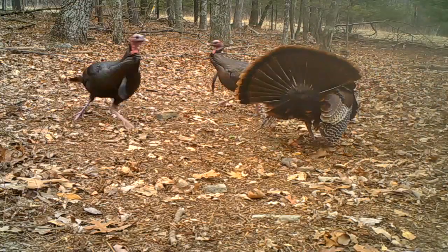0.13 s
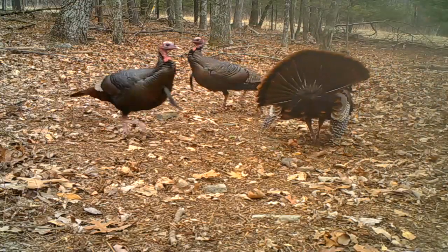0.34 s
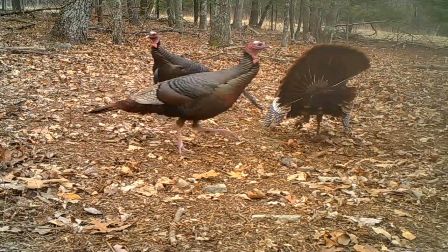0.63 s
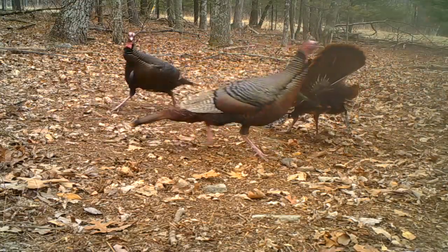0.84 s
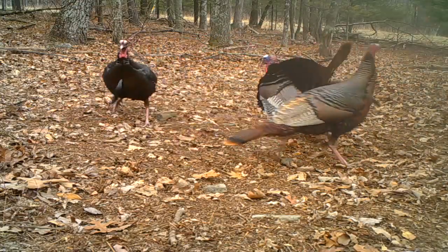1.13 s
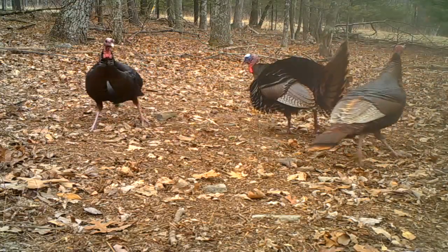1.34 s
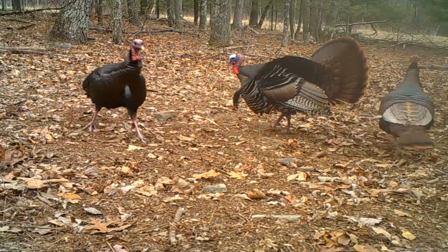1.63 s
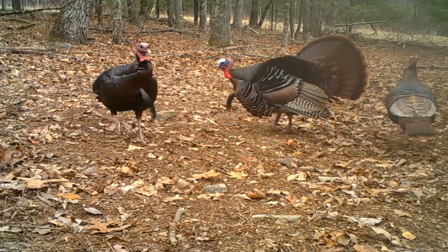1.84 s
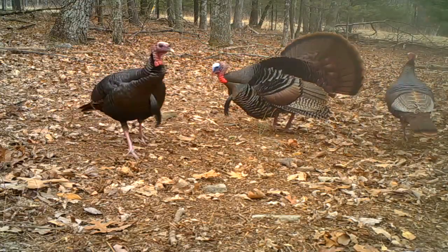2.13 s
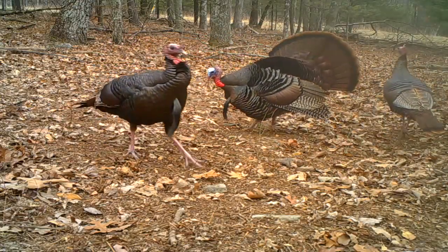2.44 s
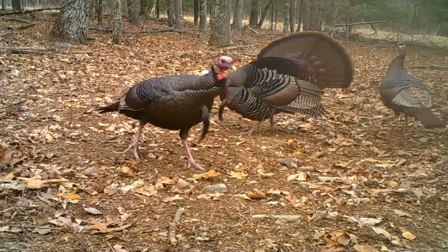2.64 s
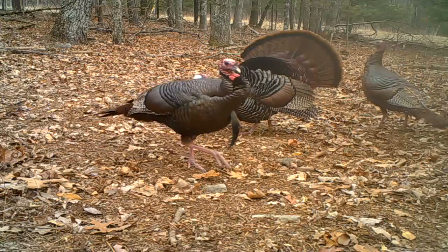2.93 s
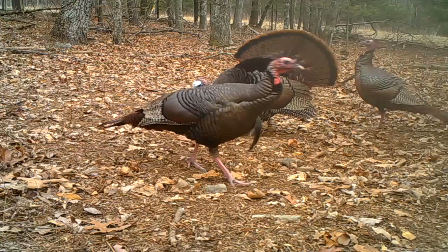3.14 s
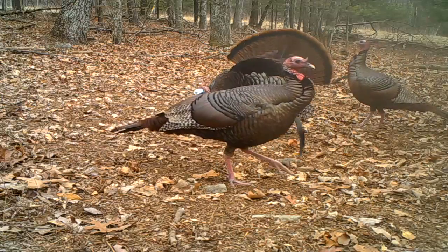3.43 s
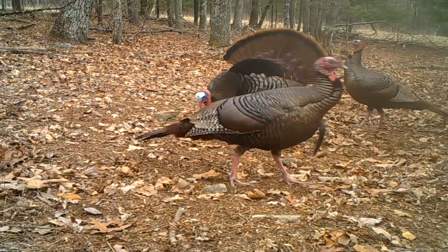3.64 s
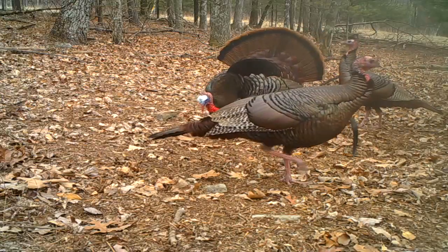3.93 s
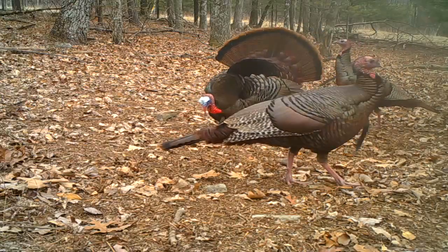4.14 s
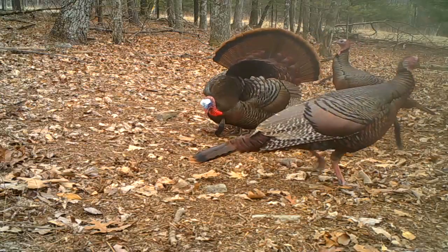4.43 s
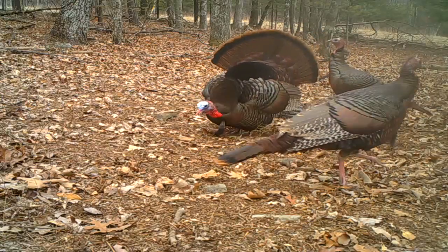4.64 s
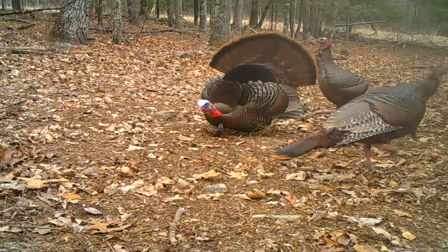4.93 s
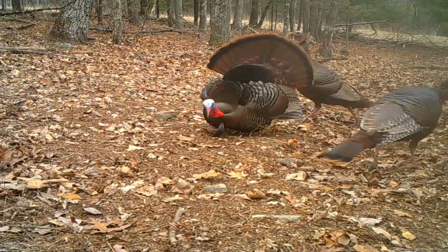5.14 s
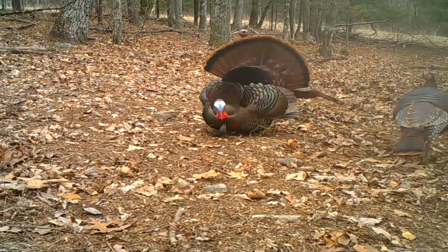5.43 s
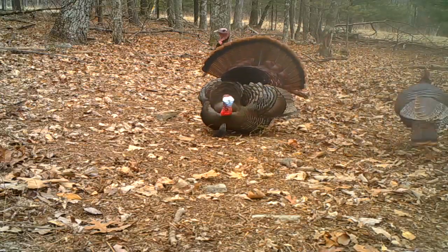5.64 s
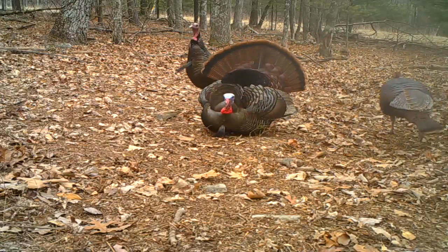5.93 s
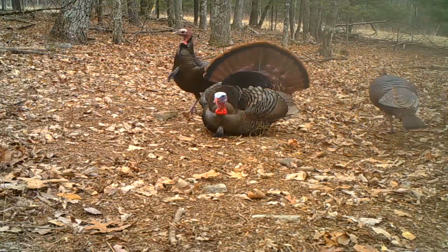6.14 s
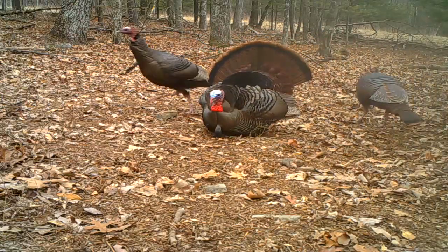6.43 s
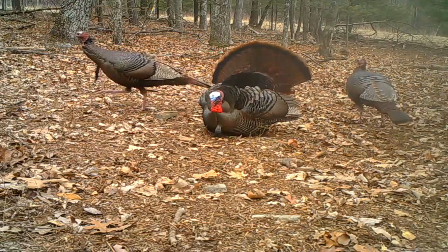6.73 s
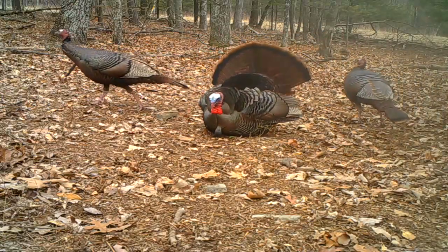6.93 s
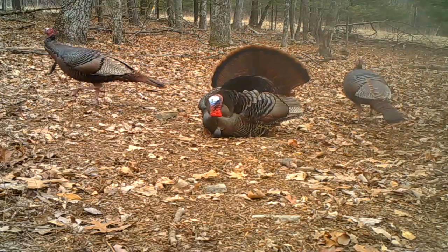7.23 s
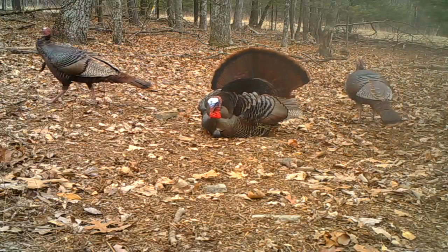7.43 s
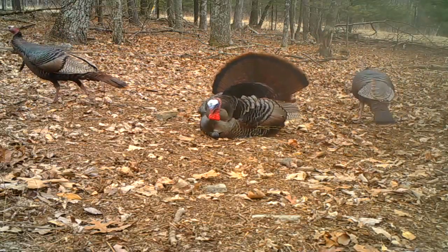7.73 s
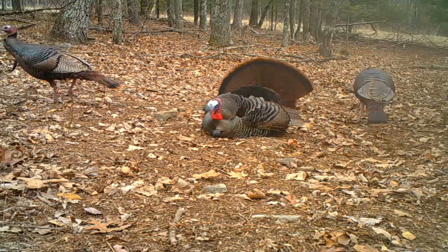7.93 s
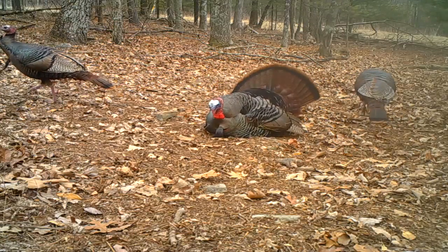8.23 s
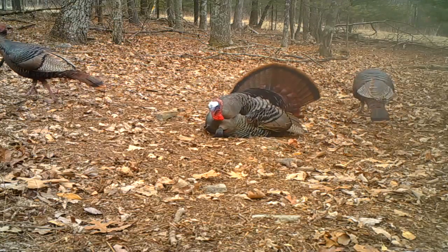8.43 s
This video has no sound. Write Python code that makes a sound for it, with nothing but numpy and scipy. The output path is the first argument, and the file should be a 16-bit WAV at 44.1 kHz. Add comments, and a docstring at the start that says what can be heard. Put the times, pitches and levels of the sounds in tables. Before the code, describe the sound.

In a quiet wood, turkeys walk close by over dry leaves. From 0 to 2 seconds irregular steps crunch brightly, with sharp leaf snaps near 0.4, 0.8, 1.05 and 1.6, while light air rumbles and bumps the microphone in soft low pulses. Small whining notes and quick falling runs appear at about 0.2, 1.2 and 1.6, with a clearer chirp-like note near 1.5. From 2 to 4 the steps are softer and sparse; gentle whines descend around 2.6, 3.3 and 3.7. A strong scuff with a cluster of crackling snaps comes at 4.05 to 4.4. Steadier crunches follow from 4.7 to 5.7, with faint low and higher whines. Quick, crisp steps gather at 6 to 6.6, then thin out. A last falling whine comes near 7.5, a tiny note at 7.9, and light rustles end at 8.5 over a faint hush with a thin tree echo.

```python
"""Dry leaves crunch and tick under wild turkeys that walk and shuffle over a quiet woodland floor.
Each step is a shower of tiny noise cracks, joined by the damped sine clicks of stiff leaves snapping.
The birds whine softly in single notes and mostly falling runs, sung as three partials with arched pitch.
Filtered noise makes the hush of trees and the rumble of light air, which bumps the microphone in short
low-pitched pulses; the ground and the trunks add one early echo and a thin tail."""
import sys
import numpy as np
from scipy import signal
from scipy.fft import rfft, irfft, next_fast_len
from scipy.io import wavfile
from scipy.ndimage import uniform_filter1d

SR = 44100
rng = np.random.default_rng(int(sys.argv[2]) if len(sys.argv) > 2 else 0)


def inscribe(sig):
    """Save sig as 16-bit PCM at rate SR to the path in sys.argv[1].

    A 1-D sig is mono; a 2-D sig holds one channel per row.
    Samples are clipped to [-1, 1] before scaling.
    """
    pcm = np.round(np.clip(np.atleast_2d(sig).T, -1, 1) * 32767)
    wavfile.write(sys.argv[1], SR, pcm.astype(np.int16))


N = 378819
T = np.arange(N) / SR

# footfalls and scuffs, before colour and trim:
# (t/s, pressing time/s, toe drag after it/s, level/dB, extra body below 2.5 kHz/dB)
FOOTFALLS = [(0.0, 0.021, 0.036, -45.5, -1.5), (0.152, .045, 0, -41.5, -0.5),
             (0.212, 0.023, 0.0567, -37.5, 1.5), (.425, 0.0192, 0.111, -37, -0.5),
             (0.745, 0.0374, 0.0044, -44.5, 1), (.801, 0.02155, 0.0102, -33.5, -8.5),
             (1.04, 0.0288, 0.017, -32, -2.5), (1.11, 0.072, 0.0029, -49, 6),
             (1.235, .023, 0.00051, -35.5, -2), (1.336, 0.1, 0.012, -46, 3),
             (1.473, 0.0206, 0.012, -43.5, 2.5), (1.544, .012, 0.007, -33, -12.5),
             (1.566, 0.0353, .07, -33.5, 2), (1.808, 0.0241, 0.0042, -41.5, 5.5),
             (2.002, 0.0874, 0.0072, -51, 1), (2.206, 0.0485, 0.0034, -45, -2.5),
             (2.44, 0.0416, 0.023, -43.5, -3), (2.72, 0.057, 0.014, -53.5, 7), (3.037, .011, 0, -47, -3),
             (3.485, 0.0244, 0.0083, -38.5, 3), (3.55, 0.0874, 0.0086, -52, 1),
             (4.055, 0.0188, 0.016, -38, 5), (4.074, .047, .11, -32, .5), (4.35, 0.0446, 0.0016, -44, 4),
             (4.681, 0.0995, 0.05, -48, 4), (4.809, 0.0827, 0.008, -38.5, -0.5),
             (5.031, 0.0624, 0.00064, -38.5, 1.5), (5.091, .066, 0.016, -38, 2.5),
             (5.36, 0.082, 0, -40.5, 0), (5.448, 0.0246, .03, -38.5, 2.5), (5.636, 0.107, 0.034, -47, -2),
             (6.056, 0.024, 0.051, -36, -4), (6.145, 0.0261, 0.0316, -34.5, -1.5),
             (6.249, 0.0257, 0, -43, -16.5), (6.315, 0.0284, 0.012, -42.5, -18.5),
             (6.443, 0.0193, 0.024, -42, 3), (6.5, 0.0406, 0.0094, -43.5, 3.5),
             (6.548, 0.0174, 0.0104, -38.5, -3), (6.804, 0.1004, 0.013, -41.5, -0.5),
             (7.095, 0.0457, 0.0083, -47.5, -10.5), (7.256, 0.00994, 0.0017, -36.5, -18),
             (7.405, 0.0388, 0.0055, -45, 1), (7.908, 0.0366, 0.017, -45, 0),
             (8.218, .016, 0.0052, -42, -4), (8.28, 0.061, 0.0064, -51, -1)]
# colour of cracking leaves, relative: (f/Hz, level/dB)
LEAF_COLOUR = [(300, -21), (700, -20), (1300, -12), (2300, -8.5), (3200, -9.5), (4000, -6), (5000, -5),
               (6200, -.5), (8000, -1), (10500, -3), (12500, -5.5), (15500, -10)]


def undb(db):
    """Decibels to gain."""
    return 10 ** (np.asarray(db) / 20)


def unit(x):
    """Scale to an rms of one."""
    return x / np.sqrt(np.mean(x ** 2) + 1e-18)


def add(out, s, x):
    """Mix x into out from time s on."""
    i = max(int(s * SR), 0)
    out[i:i + len(x)] += x[:max(N - i, 0)]


def curve(rows):
    """Gain over time from rows of (t/s, level/dB)."""
    return undb(np.interp(T, *np.transpose(rows)))


def colour(x, points):
    """Causal minimum-phase filter through (f/Hz, level/dB) points, by way of the cepstrum."""
    size = 2 * next_fast_len(len(x))
    hz, db = np.transpose(points)
    f = np.maximum(np.fft.rfftfreq(size, 1 / SR), 1)
    log_gain = np.log(undb(np.interp(np.log(f), np.log(hz), db)))
    cepstrum = irfft(log_gain)
    # folding the second half onto the first makes the filter causal
    cepstrum[1:size // 2] *= 2
    cepstrum[size // 2 + 1:] = 0
    response = np.exp(rfft(cepstrum))
    return irfft(rfft(x, size) * response)[:len(x)]


def walk(rate):
    """Slow chance with an rms of one: random levels held 1 / rate s and smoothed twice."""
    hold = max(int(SR / rate), 1)
    levels = np.repeat(rng.standard_normal(N // hold + 1), hold)
    smooth = uniform_filter1d(uniform_filter1d(levels, hold), hold)
    return unit(smooth[:N])


def crackle(rate, spread_db, ring_s, hiss):
    """Tiny leaf cracks, most of them weak: bursts of noise whose power decays, over a steady fine hiss."""
    size = undb(spread_db * np.minimum(rng.exponential(size=N), 4.5))
    hits = rng.random(N) < rate / SR  # rate in cracks per second
    power = signal.lfilter([1], [1, -np.exp(-1 / (ring_s * SR))], hits * size ** 2)
    envelope = np.sqrt(power / power.mean() + hiss ** 2)
    return unit(envelope * rng.standard_normal(N))


def wood(level_db=-50.5, swell_db=0.17):
    """The distant hush of the trees: coloured noise that swells very slightly."""
    # colour of the still wood, relative: (f/Hz, level/dB)
    wood_colour = [(15, -0.5), (60, 10.5), (95, 6.5), (130, 2.5), (170, 2), (260, -2.5), (400, -5.5),
                   (650, -7), (1000, -9), (2000, -12.5), (3200, -14), (6500, -18), (10000, -17),
                   (15500, -16)]
    hush = unit(colour(rng.standard_normal(N), wood_colour))
    return hush * undb(level_db + swell_db * walk(1.957))


def air(trim_db=1, gust_db=0.5):
    """Light air rumbles on the microphone as low noise and now and then bumps it with a brief low pulse."""
    # rumble of the breeze, before trim and gusts: (t/s, level/dB)
    breeze = [(0, -43), (1.5, -41.5), (1.9, -50.5), (2.6, -45.5), (3.4, -50), (8.59, -49.5)]
    # colour of the rumble, relative: (f/Hz, level/dB)
    rumble_colour = [(5, -1.5), (15, -3.5), (30, -7), (50, -15.5), (85, -20), (125, -27.5), (300, -62)]
    # bumps of air: (t/s, f/Hz, envelope width/s, peak/dB)
    air_bumps = [(.135, 29, 0.0083, -26.5), (0.179, 66.4, 0.00567, -25.5), (0.591, 51.5, 0.0049, -28.5),
                 (.795, 31, 0.0079, -31.5), (0.945, 45, 0.015, -35.5), (1.348, 31.2, 0.0256, -32),
                 (1.395, 78.9, 0.00458, -29.5)]
    rumble = unit(colour(rng.standard_normal(N), rumble_colour))
    out = rumble * curve(breeze) * undb(trim_db + gust_db * walk(3.9))
    t = T[:SR // 4] - 1 / 8  # each bump peaks at t = 0
    for s, hz, width, db in air_bumps:
        bump = np.cos(2 * np.pi * hz * t) / np.cosh(t / width)
        add(out, s + t[0], undb(db) * bump)
    return out


def stir(trim_db=-3.0, flicker_db=3.0):
    """Feet further off and trailing wing tips keep the litter ticking: sparse cracks that flicker in level."""
    # leaves stirring between the steps, before trim and flicker: (t/s, level/dB)
    stir_level = [(0.0, -48.5), (0.41, -47.5), (0.57, -49), (0.86, -54), (1.5, -50), (1.82, -51.5),
                  (2.37, -51), (3.18, -55), (4.06, -58.5), (4.23, -40.5), (4.38, -65), (4.62, -49),
                  (4.81, -51.5), (5.24, -48.5), (5.91, -57), (6.29, -47.5), (6.65, -53.5), (8.59, -54)]
    ticks = unit(colour(crackle(rate=350, spread_db=3.0, ring_s=0.00065, hiss=0.927), LEAF_COLOUR))
    return ticks * curve(stir_level) * undb(trim_db + flicker_db * walk(25))


def whines(third_db=-8, waver=0.0254, stumble_octaves=0.03474, uneven_db=1.58,
           rest_share=0.123, hold_share=0.706):
    """Nearly pure notes step along in pitch; each rises and sags with the pulse of pressure behind it."""
    # single notes or runs, level before fade and throat, overtone relative to the fundamental:
    # (t/s, length/s, first f/Hz, last f/Hz, level/dB, overtone/dB)
    whine_runs = [(0.057, 0.0096, 1057, 1450, -51.5, -14), (0.173, 0.0808, 1387, 662, -50, -11),
                  (.986, 0.0131, 1300, 1724, -56, -14), (1.155, 0.0187, 1260, 1677, -53, -11),
                  (1.207, 0.0215, 1406, 1470, -47, -19.5), (1.23, 0.0797, 1174, 1027, -47, -10),
                  (1.307, .075, 929.7, 590.8, -55, -1.5), (1.476, 0.0108, 1100, 1968, -39.5, -20),
                  (1.59, 0.0993, 1380, 585, -49.5, -4), (2.553, 0.0372, 1644, 1480, -49, -18),
                  (2.627, 0.0403, 1390, 1288, -50, -11.5), (2.696, 0.0388, 1092, 951, -51.5, -8),
                  (3.04, 0.0117, 1266, 1792, -42.5, -20), (3.246, 0.0372, 1394, 1484, -49, -20.5),
                  (3.297, 0.1286, 1170, 553.5, -54.5, -5.5), (3.636, 0.0493, 1380, 888, -56, 2.5),
                  (3.69, 0.0402, 616.7, 425, -58, -3.5), (3.738, 0.049, 318.2, 240, -54.5, -13),
                  (4.703, 0.0685, 661.8, 595.3, -49, -17), (4.779, 0.039, 648, 672, -53.5, -7.5),
                  (4.847, 0.0082, 1390, 1390, -47, 1), (4.897, 0.0215, 1520, 1338, -50, -20.5),
                  (4.937, 0.022, 1471, 1347, -48.5, -20), (5.01, 0.025, 1400, 1391, -61, -19),
                  (5.61, 0.027, 719, 739.5, -47.5, -4.5), (5.834, 0.0604, 657.2, 600.3, -52.5, -7),
                  (5.91, 0.053, 1393, 1402, -53, -18.5), (5.978, 0.0546, 1502, 1239, -54, -21.5),
                  (6.112, .062, 1445, 1386, -59, -16), (7.489, 0.016, 1403, 1320, -56, -16),
                  (7.516, 0.0684, 1085, 878.5, -57.5, 2), (7.585, 0.0632, 702, 470, -55.5, -8.5),
                  (7.895, 0.019, 664, 642, -54.5, -6.5)]
    # what the throat lets through: (f/Hz, level/dB)
    throat = [(280, 1.5), (650, -2.5), (1000, -2.5), (1400, 0.5), (1700, -2.5), (2050, -1.5), (2800, -24.5),
              (4200, -22)]
    note_s, fade_db_per_s = .025, 19  # nominal note length; a run weakens as it goes
    # high notes of nominal length bend by arch_octaves; low or brief ones are flatter
    arch_octaves, arch_hz, flat_hz = 0.3997, 1299.6, 618
    out, unsteady = np.zeros(N), walk(300)
    for s, length, first_hz, last_hz, db, overtone_db in whine_runs:
        t = T[:int(length * SR)]
        notes = max(round(length / note_s), 1)
        note, through = np.divmod(notes * t / length, 1)
        u = 2 * through - 1  # -1 to 1 through each note

        # in a run of three or more, notes part, mostly hold their own pitch, and step unevenly
        run = float(notes > 2)
        stumble, strength = run * rng.standard_normal((16, 2))[note.astype(int)].T
        progress = (note + .5 + (1 - run * hold_share) * u / 2) / notes
        slide = first_hz + (last_hz - first_hz) * progress
        height = np.clip((slide - flat_hz) / (arch_hz - flat_hz), 0, 1)
        arch = arch_octaves * height * (u * length / notes / note_s) ** 2
        wavering = 1 + waver * np.roll(unsteady, -int(s * SR))[:len(t)]
        pitch = slide * 2 ** (stumble_octaves * stumble - arch) * wavering
        phase = 2 * np.pi * np.cumsum(pitch) / SR

        tone = np.zeros(len(t))
        for k, part_db in enumerate([0, overtone_db, overtone_db + third_db], 1):
            throat_db = np.interp(k * pitch, *np.transpose(throat))
            tone += undb(part_db + throat_db) * np.sin(k * phase)

        # rests between the notes of a run narrow each pulse
        sounding = 1 - run * np.clip(rest_share, 0, .5)
        pressure = unit(np.cos(np.pi / 2 * u / sounding).clip(0) ** .5)
        level = undb(db - fade_db_per_s * t + uneven_db * strength)
        add(out, s, np.sqrt(2) * tone * pressure * level)
    return out


def lesser_snaps(every_s=.045, over_db=9, scatter_db=-0.5, ring_hz=7400, scatter_octaves=0.112):
    """While a foot is down, leaves break at random moments, louder at louder steps: (t/s, peak/dB, f/Hz)."""
    rows = []
    for s, press, drag, db, _ in FOOTFALLS:
        moments, chance = rng.random(8), rng.standard_normal((8, 2))
        breaks = max(round((press + drag) / every_s), 1)
        for moment, (size, stiffness) in zip(moments[:breaks], chance):
            start = s + moment * (press + drag)
            peak_db = db + over_db + scatter_db * size
            rows.append((start, peak_db, ring_hz * 2 ** (scatter_octaves * stiffness)))
    return rows


def snaps(ring_cycles=1.203, twig_hz=6200, flutter_s=0.00168, flutter_db=-16, trim_db=-.5):
    """A stiff leaf breaks with a click of a few cycles, then its blade flutters; low twigs ring on longer."""
    # the loudest stiff leaves and twigs, before trim: (t/s, peak/dB, ring f/Hz)
    loud_snaps = [(.436, -15.5, 9360), (.812, -12, 6950), (.817, -19, 7950), (1.05, -16, 9700),
                  (1.077, -22, 7760), (1.199, -22, 9000), (1.282, -27.5, 8000), (1.443, -28.5, 11800),
                  (1.575, -14.5, 8500), (1.626, -17, 6230), (1.814, -21, 6370), (1.955, -27.5, 7200),
                  (2.121, -28.5, 7000), (2.537, -24.5, 10100), (3.15, -35, 7600), (3.488, -26.5, 6360),
                  (3.628, -31, 12930), (3.666, -28, 8050), (4.051, -24.5, 5080), (4.076, -19, 4970),
                  (4.139, -21, 8700), (4.157, -16, 9080), (4.174, -17.5, 9100), (4.189, -21, 6016),
                  (4.24, -20.5, 6500), (4.263, -28, 4930), (4.371, -23.5, 8474), (4.703, -23.5, 5360),
                  (4.736, -25.5, 7050), (5.177, -19.5, 6890), (5.232, -25.5, 6980), (5.297, -28.5, 9400),
                  (5.366, -25.5, 8350), (5.452, -24, 7250), (5.461, -23.5, 5780), (6.008, -24, 7050),
                  (6.063, -19, 8197), (7.259, -25, 7417), (8.495, -34, 3734)]
    out, t = np.zeros(N), T[:SR // 50]
    for s, db, hz in list(loud_snaps) + lesser_snaps():
        cycles = hz * t
        ring = ring_cycles * max(twig_hz / hz, 1) ** 2  # decay in cycles, longer below twig_hz
        click = np.sin(2 * np.pi * cycles) * np.exp(-cycles / ring) * np.tanh(cycles)
        flutter = unit(colour(rng.standard_normal(len(t)), LEAF_COLOUR)) * np.exp(-t / flutter_s)
        snap = click + undb(flutter_db) * flutter
        add(out, s, undb(db + trim_db) * snap / np.abs(snap).max())
    return out


def steps(rise_s=.002, rise_share=.13, release_s=0.00505, drag_db=-5.0, settle_s=0.0556, settle_db=-12,
          dull_db=-3, sag_db=2.08, ragged_db=0.94, crisp_db=-0.56, trim_db=-0.5):
    """A foot crushes leaves, may drag its toes, and lets go; they settle quietly. Slow steps start softer."""
    cracks = unit(colour(crackle(rate=1900, spread_db=4.0, ring_s=0.000263, hiss=0.72), LEAF_COLOUR))
    # the litter gives way in small jerks
    cracks = cracks * undb(ragged_db * walk(140))
    out, t = np.zeros(N), T[:SR // 2]
    for s, press, drag, db, body_db in FOOTFALLS:
        rise = rise_s + rise_share * press
        after = np.maximum(t - press - rise / 2, 0)
        crush = np.exp(-after / release_s)
        toes = undb(drag_db) * np.exp(-np.maximum(after - drag, 0) / release_s)
        settling = undb(settle_db) * np.exp(-after / settle_s)
        trail = np.maximum(np.maximum(toes, settling) - crush, 0)

        grains = np.roll(cracks, -int(s * SR))[:len(t)]
        grains = grains / np.std(grains[:int(press * SR)])
        # fewer leaves are left to break as the foot sinks
        sag = undb(sag_db * (.5 - np.minimum(t / press, 1)))
        grains = grains * np.minimum(t / rise, 1) * sag

        # leaves already crushed are duller
        dulled = colour(grains * trail, [(2500, dull_db / 2), (6000, 0), (12000, dull_db)])
        step = grains * crush + dulled
        # deep litter sounds fuller than thin top leaves
        step = colour(step, [(2500, body_db), (6000, 0), (12000, crisp_db)])
        add(out, s - rise / 2, undb(db + trim_db) * step)
    return out


def ground(x, lag_s=0.000469, share=0.037):
    """The ground returns each sound a moment later, which ripples its spectrum."""
    return x + share * np.interp(T - lag_s, T, x)


def trunks(x, t60_s=0.98, wet_db=-16):
    """Scattered tree trunks send back a thin tail: convolution with coloured, decaying noise."""
    t = T[:SR]
    echo = rng.standard_normal(SR) * undb(-60 * t / t60_s) * (t > .008)  # silent for the first 8 ms
    echo = colour(echo, [(1500, -1.5), (6000, -1), (14000, -6.0)])
    return undb(wet_db) * signal.fftconvolve(x, echo / np.linalg.norm(echo))[:N]


def scene():
    """The birds among the trees, in one channel."""
    leaves = ground(steps() + snaps() + stir())
    birds = leaves + whines()
    return (birds + trunks(birds) + wood() + air())[None]


def record(dry, top_hz=15850):
    """The recorder cuts the top with a steep elliptic low-pass."""
    return signal.sosfilt(signal.ellip(10, .2, 70, top_hz, fs=SR, output="sos"), dry)


dry = scene()
out = record(dry)
inscribe(out)
```